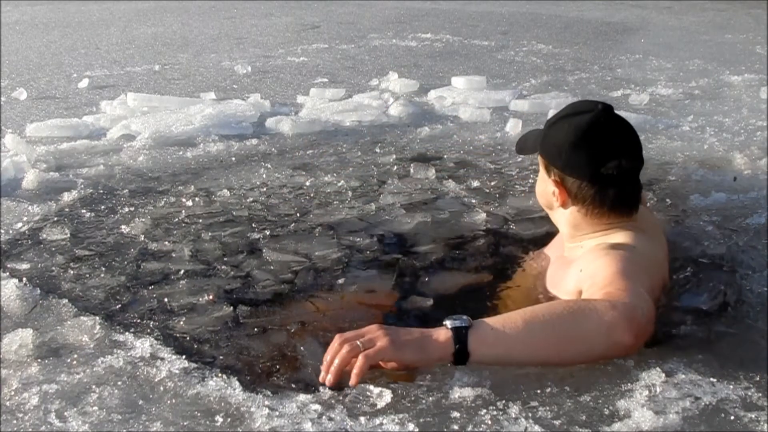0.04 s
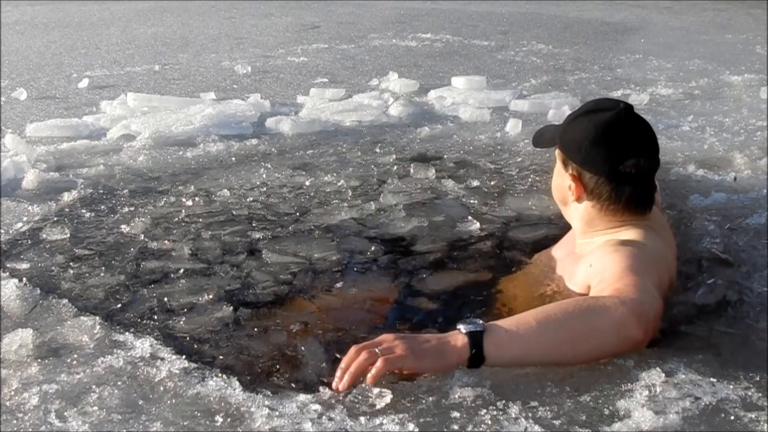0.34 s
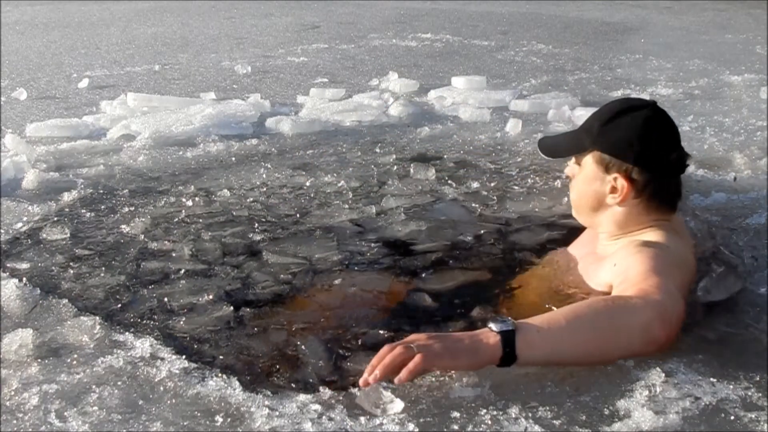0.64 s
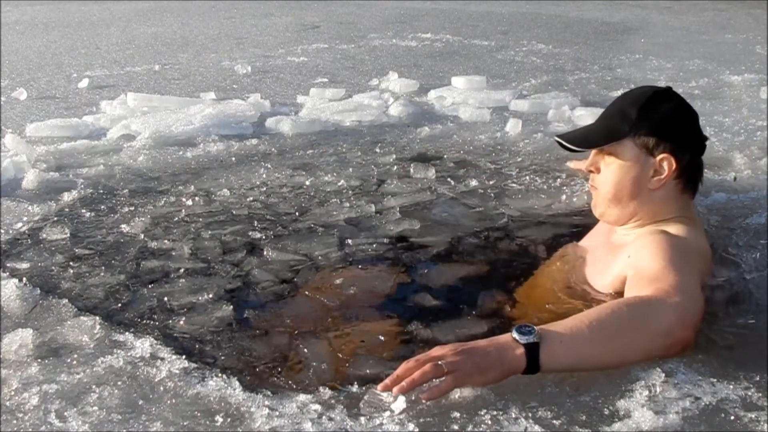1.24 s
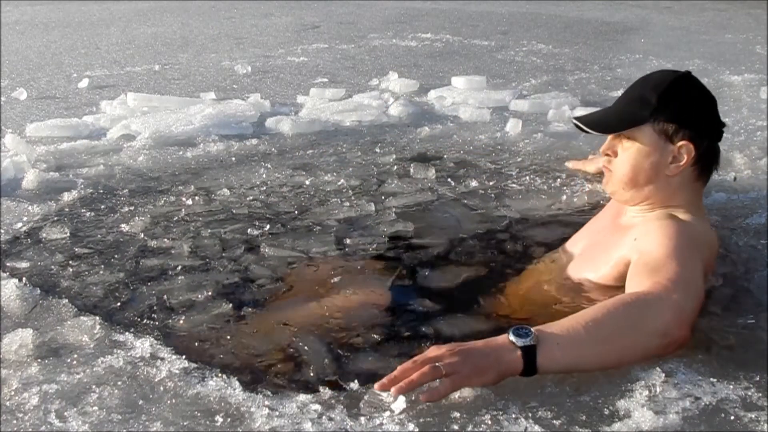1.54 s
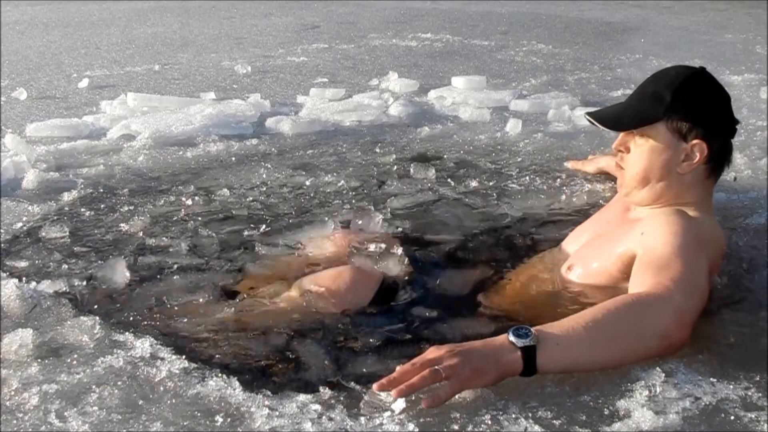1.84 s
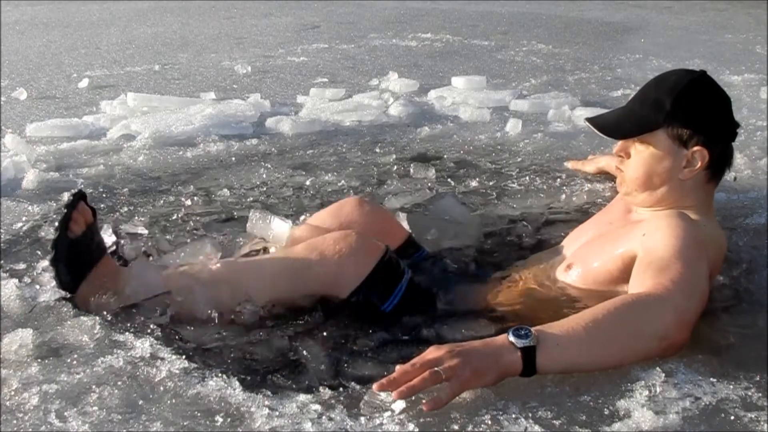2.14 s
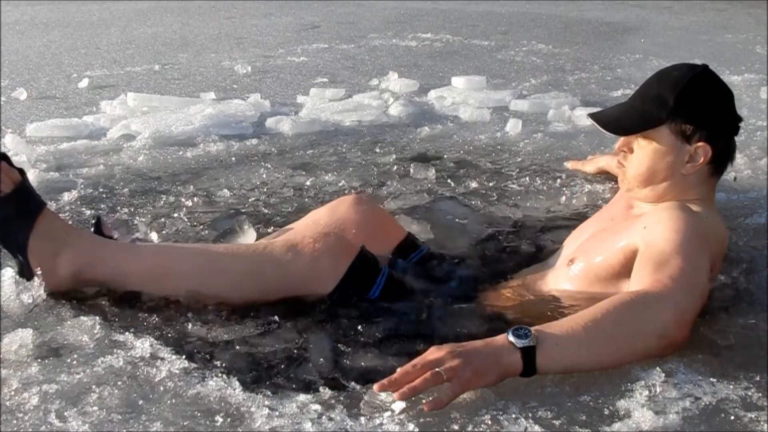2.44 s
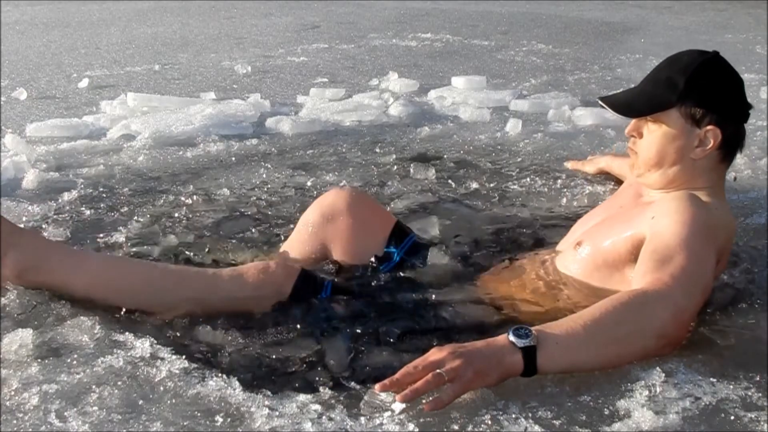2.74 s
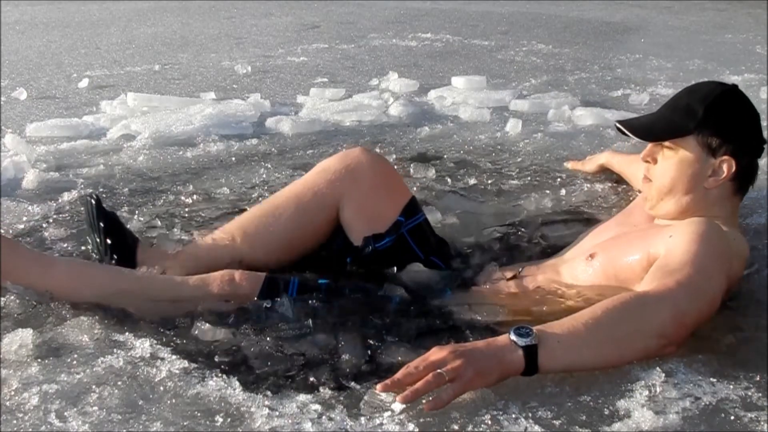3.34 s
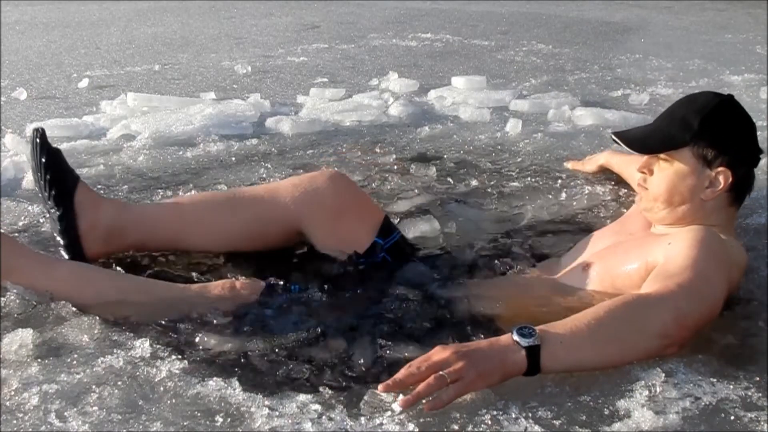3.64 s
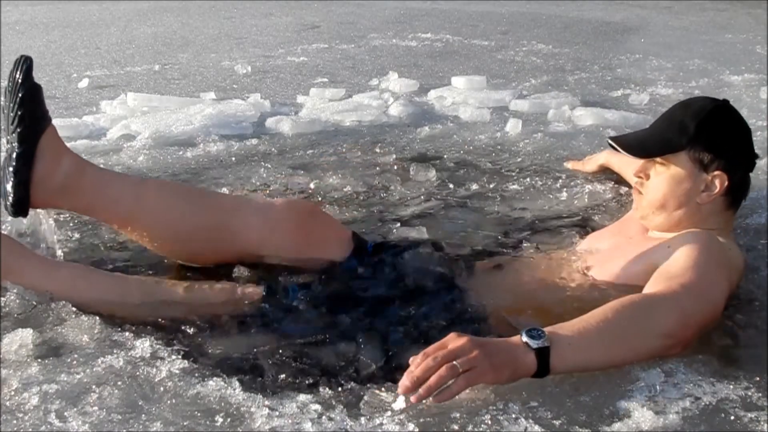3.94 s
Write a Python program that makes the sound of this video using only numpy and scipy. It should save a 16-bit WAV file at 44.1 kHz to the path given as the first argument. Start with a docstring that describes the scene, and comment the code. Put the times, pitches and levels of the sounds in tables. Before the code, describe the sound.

Water and broken ice slosh and crackle as a bather moves in an ice hole. A low gulp comes near 0.4 seconds, and thin ice snaps, clinks and knocks until about 1.6. From 1.9 to 3 seconds, water pours more loudly off a lifted leg, bubbling and plopping. Softer sloshing, drips and clinks follow until 4 seconds. Wind rumble gradually fades over a faint steady hum.

```python
"""An ice hole, a bather shifting in it: slush crackles, floes knock, thin ice snaps, shards chink.
Each leg lifts and water pours off it in bubbles, which ring and rise in pitch as they near the surface.
Wind rumbles, dying away. The camera hums and whines faintly; its two close ports hear bass alike
and treble opposed. Sources are (mid, side) pairs; bearing is the side weight, left positive."""
import sys
import numpy as np
from scipy import signal
from scipy.fft import rfft, irfft
from scipy.io import wavfile
from scipy.ndimage import uniform_filter1d

SR = 44100
rng = np.random.default_rng(int(sys.argv[2]) if len(sys.argv) > 2 else 0)


def wav_out(sig):
    """Save sig, one row per channel (or a flat mono array), as 16-bit PCM at SR to the path in sys.argv[1]."""
    wavfile.write(sys.argv[1], SR, np.round(np.clip(np.atleast_2d(sig).T, -1, 1) * 32767).astype(np.int16))


N = 176400
T = np.arange(N) / SR
FREQS_HZ = np.arange(N // 2 + 1) * SR / N
BEARING_SCATTER = 0.65

# Stirring strength. Each row: time in seconds, then gurgle, patter and crackle gains in dB.
SLOSH_DB = [(0.0, -43.5, -48, -51), (0.1, -46.5, -51, -58), (0.24, -43, -43.5, -48),
            (0.39, -45.5, -49, -50), (0.48, -42, -42.5, -48), (0.72, -41.5, -41, -41.5),
            (0.95, -43, -42.5, -42), (1.12, -39.5, -43.5, -41), (1.22, -40, -41.5, -44.5),
            (1.4, -55.5, -47.5, -55), (1.585, -40.5, -38, -45.5), (1.62, -55, -52.5, -55.5),
            (1.785, -52, -53, -58), (1.82, -47, -45.5, -48.5), (1.875, -42.5, -38.5, -49.5),
            (2.03, -40, -39.5, -48), (2.13, -33, -34, -36.5), (2.34, -30, -36.5, -40),
            (2.58, -35.5, -39.5, -42.5), (2.73, -33, -35.5, -40), (2.87, -38, -40.5, -46.5),
            (2.98, -50.5, -45.5, -50), (3.07, -39.5, -41, -45.5), (3.21, -38.5, -38, -37.5),
            (3.36, -41.5, -42, -45.5), (3.48, -44, -40, -46), (3.62, -43, -47, -52),
            (3.78, -44, -46.5, -51.5), (3.9, -44, -46, -52), (4.0, -49, -49, -55.5)]


def undb(db):
    """Decibels to gain."""
    return 10 ** (np.asarray(db) / 20)


def unit(x):
    """Scale to rms 1."""
    return x / np.sqrt(np.mean(x ** 2))


def curve(rows, column=1):
    """Gain over time from one dB column."""
    rows = np.array(rows)
    return undb(np.interp(T, rows[:, 0], rows[:, column]))


def response(points):
    """Gain per frequency from (Hz, dB) points."""
    hz, db = np.array(points).T
    return undb(np.interp(np.log(FREQS_HZ + 1), np.log(hz), db))


def colour(x, points):
    """Filter by (Hz, dB) points."""
    return irfft(rfft(x) * response(points), N)


def walk(rate_hz):
    """Smooth random drift, rms 1."""
    hold = max(int(SR / rate_hz), 1)
    return unit(uniform_filter1d(np.repeat(rng.standard_normal(1000), hold)[:N], hold))


def decay(t, t60_s):
    """Exponential fall, 60 dB in t60_s."""
    return np.exp(-np.log(1000) * t / t60_s)


def add(out, start_s, sound, bearing):
    """Mix a short sound into (mid, side)."""
    i = int(max(start_s, 0) * SR)
    part = sound[:max(N - i, 0)]
    out[:, i:i + len(part)] += np.array([part, bearing * part])


def noise(points, width):
    """Coloured noise, side scaled by width."""
    return unit(colour(rng.standard_normal((2, N)), points)) * np.array([[1], [width]])


def ring(hz, t60_s, rise=0, attack_s=0.0012):
    """Damped note of a bubble or shard; rise is the share of pitch gained over t60_s."""
    t = T[:int(t60_s * SR) + 2]
    envelope = (1 - np.exp(-t / attack_s)) * decay(t, t60_s)
    return envelope * np.sin(2 * np.pi * hz * t * (1 + rise * t / t60_s / 2))


def camera(motor_hz=100.1, whine_hz=15734, whine_db=-69, hiss_db=-57):
    """Motor hum, thin electrical whine and hiss."""
    motor_db = [(0, -48.5), (1.2, -48.5), (2.5, -42), (4, -44.5)]  # Each row: time in seconds, hum level in dB.
    hiss_colour = [(3500, -1), (5000, -14), (10500, 15), (15500, 23)]  # Each row: frequency in Hz, gain in dB.
    hum_hz = motor_hz * (1 + 0.0036 * walk(8.28))
    hum = np.sqrt(2) * np.sin(2 * np.pi * np.cumsum(hum_hz) / SR) * curve(motor_db)
    whine = np.sqrt(2) * np.sin(2 * np.pi * whine_hz * T) * undb(whine_db)
    return np.array([hum + whine, whine]) + noise(hiss_colour, width=0.8) * undb(hiss_db)


def wind():
    """Low rumble, higher rush, deep buffeting and distant open air."""
    # Wind strength. Each row: time in seconds, level in dB.
    rumble_db = [(0, -40.5), (.7, -38.5), (1.8, -44), (3.3, -45.5), (4, -55)]
    rush_db = [(0, -44.5), (.9, -40.5), (1.9, -41.5), (3, -51.5), (4, -53)]
    buffet_db = [(0, -50.5), (4, -44.5)]
    # Spectra. Each row: frequency in Hz, gain in dB.
    rumble_colour = [(90, -52), (140, -2), (200, 5), (310, 0.5), (380, -1.5), (520, -38.5)]
    rush_colour = [(250, -7), (380, -2), (510, 1.5), (700, -4.5), (1000, -15), (1600, -23), (2600, -25),
                   (4000, -53)]
    buffet_colour = [(15, -24), (28, -12), (40, -1), (70, 5), (110, 9), (150, 2.5), (250, -30.5)]
    distant_colour = [(400, -10.5), (800, 5.5), (1300, 4), (2400, -3), (3500, -57), (5000, -60)]
    rumble = noise(rumble_colour, width=0.52) * curve(rumble_db) * undb(-0.5 + 0.35 * walk(18))
    rush = noise(rush_colour, width=0.31) * curve(rush_db) * undb(0.5 + 0.86 * walk(18))
    buffet = noise(buffet_colour, width=0.7) * curve(buffet_db)
    distant = noise(distant_colour, width=0.99) * undb(-46)
    return rumble + rush + buffet + distant


def gust(width_hz=74):
    """A low, hollow gust of wind: one rough swell, sinking in pitch."""
    glide = [(.3, 299.6, -54), (.335, 309.5, -31.5), (.39, 306.2, -38.5), (.43, 297.5, -32),
             (.53, 251, -39), (.64, 240, -48)]  # Each row: time in seconds, pitch in Hz, level in dB.
    times_s, hz, _ = np.array(glide).T
    rough = unit(irfft(rfft(rng.standard_normal((2, N))) / (1 + (FREQS_HZ / width_hz) ** 4), N))
    phase = 2 * np.pi * np.cumsum(np.interp(T, times_s, hz)) / SR
    swell = rough[0] * np.sin(phase) + rough[1] * np.cos(phase)
    gate = (T > times_s[0]) * (T < times_s[-1])
    return np.array([swell * curve(glide, column=2) * gate, np.zeros(N)])


def shards(ticks_per_s=32, chinks_per_s=26, chink_hz=3593):
    """Loose shards touch at random: ticks and chinks, as strong as the water is stirred."""
    tick_colour = [(7400, -20), (10200, 13), (15500, -19)]  # Each row: frequency in Hz, gain in dB.
    ticks, chinks = np.zeros((2, 2, N))
    t = T[:SR // 40]
    for when, size, place in rng.random((int(ticks_per_s * N / SR), 3)):
        tick = rng.standard_normal(len(t)) * decay(t, t60_s=0.01)
        add(ticks, when * N / SR, tick * undb(4 + 2 * size), np.sign(place - 0.5))
    for when, size, place, pitch in rng.random((int(chinks_per_s * N / SR), 4)):
        chink = ring(chink_hz * (1 + 0.159 * (2 * pitch - 1)), t60_s=0.033)
        add(chinks, when * N / SR, chink * undb(6 + 2 * size), np.sign(place - 0.5))
    return colour(ticks, tick_colour) * curve(SLOSH_DB, column=3) + chinks * curve(SLOSH_DB, column=2)


def tinkles(taps_per_s=90):
    """A jostled shard rattles, each touch at a slightly different pitch."""
    rattles = [(0.582, .79, 3334, -41), (3.425, 3.52, 3440, -40)]  # Each row: start and end in seconds, pitch in Hz, rms level in dB.
    out = np.zeros((2, N))
    for start_s, end_s, hz, db in rattles:
        taps = np.zeros((2, N))
        span_s = end_s - start_s
        for k, (late, size, pitch) in enumerate(rng.random((int(span_s * taps_per_s) + 1, 3))):
            tap = ring(hz * (1 + 0.028 * (2 * pitch - 1)), t60_s=0.033)
            add(taps, start_s + (k + late) / taps_per_s, size * tap, bearing=-1)
        out += unit(taps) * np.sqrt(span_s * SR / N) * undb(db)
    return out


def ice_snaps(ring_db=-2):
    """Thin plates snap: a bright noise burst and a brief ring."""
    snaps = [(.142, -31.5, 3420), (.469, -30.5, 3900), (.513, -30.5, 5400), (0.727, -31.5, 10000),
             (0.894, -31.5, 9700), (.967, -24, 10300), (1.063, -28, 2370), (1.162, -25.5, 14300),
             (1.328, -28, 3570), (1.363, -30, 12500), (1.546, -28.5, 3990), (1.550, -29.5, 3500),
             (3.043, -35, 10400), (3.474, -27, 3740), (3.828, -35.5, 12500)]  # Each row: start in seconds, level before colouring in dB, pitch in Hz.
    snap_colour = [(1200, -8), (2200, 13), (3600, 11.5), (5000, 3.5), (7400, 0.5), (10000, 7), (12000, -6),
                   (15500, -17)]  # Each row: frequency in Hz, gain in dB.
    out, t = np.zeros((2, N)), T[:SR // 20]
    for start_s, db, hz in snaps:
        crack = rng.standard_normal(len(t)) + undb(ring_db) * np.sin(2 * np.pi * hz * t)
        add(out, start_s, undb(db) * crack * decay(t, t60_s=0.013), bearing=-0.9)
    return colour(out, snap_colour)


def floe_knocks(swell_s=0.00084):
    """Floes collide and ring for a few water-damped cycles."""
    knocks = [(0.4685, 1780, -18.5, -0.99), (.471, 1800, -23.5, -0.99), (0.483, 1940, -25, -.8),
              (0.497, 1520, -20.5, -1), (0.549, 910, -29, -1), (1.183, 1980, -24, -1),
              (1.192, 1870, -14, -1.8), (1.203, 1870, -20, -1), (1.210, 1790, -22, -1),
              (1.225, 2050, -29, -1), (1.534, 2080, -24.5, -1), (1.591, 1600, -16.5, -0.55),
              (2.001, 950, -24, 0.088), (2.87, 1290, -26, -0.074)]  # Each row: start in seconds, pitch in Hz, level in dB, bearing.
    out, t = np.zeros((2, N)), T[:SR // 20]
    envelope = (t / swell_s * np.exp(1 - t / swell_s)) ** 2
    for start_s, hz, db, bearing in knocks:
        add(out, start_s, undb(db) * envelope * np.sin(2 * np.pi * hz * t), bearing)
    return out


def plops():
    """Single bubbles and drops ring out above the swarm."""
    # Each row: start in seconds, pitch in Hz, level in dB, t60 in seconds, rise share, bearing.
    drops = [(1.024, 2210, -19.5, 0.029, 0.096, -1.6), (1.878, 2500, -21, .035, 0.055, 0.98),
             (1.959, 1620, -23.5, 0.023, 0.16, -1.1), (2.014, 2580, -16.5, 0.017, .05, 1),
             (2.124, 3780, -24, 0.026, .04, -1.6), (2.160, 2350, -9, 0.025, .06, 0.59),
             (2.223, 3150, -13.5, .014, .08, 0.86), (2.266, 3300, -21.5, 0.037, .04, 1),
             (2.335, 2150, -19, .04, 0.11, 0.97), (2.448, 687, -25.5, 0.076, 0.83, 0),
             (2.479, 3260, -28, 0.04, .04, 1), (2.523, 1267, -17.5, 0.046, 0.17, .1),
             (2.741, 2090, -18, 0.02, 0.11, 0.81), (3.11, 590, -31.5, 0.06, 0.3, 0),
             (3.566, 1665, -22, 0.024, .1, -0.28), (3.595, 1450, -26, 0.041, 0.077, .3),
             (3.650, 2080, -19, .03, 0.11, 0.41), (3.680, 820, -23, 0.084, 1.64, .1),
             (3.831, 2260, -15.5, 0.024, 0.092, -0.51), (3.905, 3980, -22.5, .04, .03, 0.11),
             (3.935, 640, -33.5, 0.065, 0.81, 0)]
    out = np.zeros((2, N))
    for start_s, hz, db, t60_s, rise, bearing in drops:
        add(out, start_s, undb(db) * ring(hz, t60_s, rise), bearing)
    return out


def bubbles(low_hz, high_hz, bearing, rate_per_s=300):
    """A swarm of bubbles of random size and place, each rising in pitch as it nears the surface."""
    out = np.zeros((2, N))
    for when, pitch, life, loud, place in rng.random((int(rate_per_s * N / SR), 5)):
        hz = low_hz + (high_hz - low_hz) * pitch
        cycles = 19.8 * (0.5 + 2 * life)
        bubble = ring(hz, t60_s=cycles / hz, rise=0.29 * life)
        gain_db = min(-np.log(1 - loud), 3.5)
        offset = BEARING_SCATTER * np.sqrt(12) * (place - 0.5)
        add(out, when * N / SR, undb(gain_db) * bubble, bearing[int(when * N)] + offset)
    return out


def clicks(bearing, uneven, base_per_s=5000, spread_db=1.5):
    """Tiny contacts of ice grains and droplets, denser and smaller where the flow is even."""
    size, place, sign = rng.standard_normal((3, N))
    contact = rng.random(N) < base_per_s / uneven / SR
    hits = contact * np.sqrt(uneven) * np.sign(sign) * undb(spread_db * np.minimum(size, 2.8))
    return np.array([hits, hits * (bearing + BEARING_SCATTER * place)])


def water(flicker_db=1.66, surge_db=1.5, stir_bearing=-0.23, pour_bearing=0.31):
    """Stirred slush gurgles, patters and crackles; the pour off a leg is steadier and to the left."""
    pour_s = (1.85, 2.98, 0.23)  # Stream off the raised leg: start, end and fade in seconds.
    # Spectra. Each row: frequency in Hz, gain in dB.
    stir_gurgle = [(450, -13.5), (700, -6), (1000, -6), (1500, 1.5), (2200, 5), (2700, 4.5), (3200, -47)]
    pour_gurgle = [(300, -25), (500, -13), (800, -10), (1150, -0.5), (1600, 1), (2200, 3.5), (2700, 2.5),
                   (3200, -17)]
    patter_colour = [(2400, -26), (2950, 0), (3350, -1), (4100, -3), (4700, -5), (5500, -6), (6300, -14.5),
                     (7300, -33.5)]
    stir_crackle = [(5500, -44), (7600, -10.5), (8700, -1), (10000, 2), (11000, -1), (12600, -5.5),
                    (15500, -22)]
    pour_crackle = [(5500, -27), (7600, -16), (8800, -15), (10000, 6.5), (11400, 6.5), (13000, 0.5),
                    (15500, -27)]
    pour_side = [(1350, -6.5), (2000, 0.5)]  # side only: the stream's large, low bubbles rise close together
    start_s, end_s, fade_s = pour_s
    pour = np.clip(np.minimum(T - start_s, end_s - T) / fade_s + 0.5, 0, 1)
    bearing = stir_bearing + pour * (pour_bearing - stir_bearing)
    uneven = 1 - 0.55 * pour

    def blend(x, stirred, poured):
        return np.sqrt(1 - pour) * unit(colour(x, stirred)) + np.sqrt(pour) * unit(colour(x, poured))

    def froth(low_hz, high_hz, click_gain):
        return unit(bubbles(low_hz, high_hz, bearing)) + click_gain * unit(clicks(bearing, uneven))

    gurgle = blend(froth(low_hz=415.4, high_hz=2897, click_gain=2.3), stir_gurgle, pour_gurgle)
    gurgle[1] = (1 - pour) * gurgle[1] + pour * colour(gurgle[1], pour_side)
    patter = unit(colour(froth(low_hz=2885, high_hz=4300, click_gain=4.5), patter_colour))
    crackle = blend(clicks(bearing, uneven), stir_crackle, pour_crackle)
    flicker = undb(flicker_db * uneven * walk(45))
    out = np.zeros((2, N))
    for column, layer, trim_db in [(1, gurgle, 0.4), (2, patter, 0.64), (3, crackle, -0.3)]:
        surge = undb(trim_db + surge_db * uneven * walk(24.005))
        out += layer * surge * curve(SLOSH_DB, column)
    return flicker * out


def scene():
    """Left and right at two close ports: side is a quarter cycle off mid and strongest in the treble."""
    side_ratio = [(60, -13), (400, -9.5), (700, -4), (1100, 1), (1500, 2), (2300, 9), (4200, 13),
                  (6300, 17.5), (9000, 13), (15000, 9)]  # Each row: frequency in Hz, side over mid in dB.
    left_lead = [(600, 3), (1100, 3.5), (2100, -3), (3800, 0.5), (9000, -1.5), (12000, 1)]  # Each row: frequency in Hz, left over right in dB.
    pool = water() + gust() + plops() + floe_knocks() + ice_snaps() + tinkles()
    mid, side = rfft(pool + wind() + camera() + shards())
    angle = np.arctan(response(side_ratio))
    mid, side = mid * np.cos(angle), 1j * side * np.sin(angle)
    lean = np.sqrt(response(left_lead))
    return irfft(np.array([(mid + side) * lean, (mid - side) / lean]), N)


def record(dry, top_hz=15900):
    """Two narrow dips in the response and a steep top edge."""
    dips = [(2850, 334), (4990, 240)]  # Each row: centre in Hz, width in Hz.
    for hz, width_hz in dips:
        dry = signal.lfilter(*signal.iirnotch(hz, hz / width_hz, SR), dry)
    return signal.sosfilt(signal.ellip(10, 0.2, 70, top_hz, fs=SR, output="sos"), dry)


dry = scene()
out = record(dry)
wav_out(out)
```